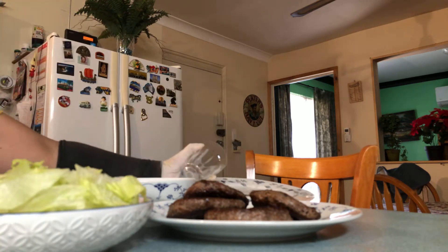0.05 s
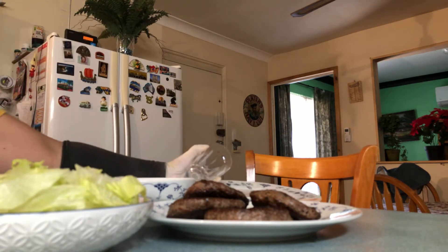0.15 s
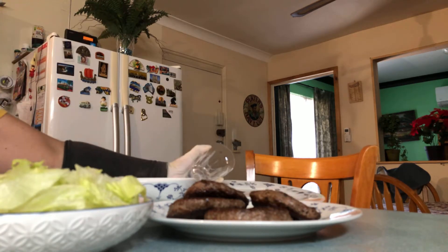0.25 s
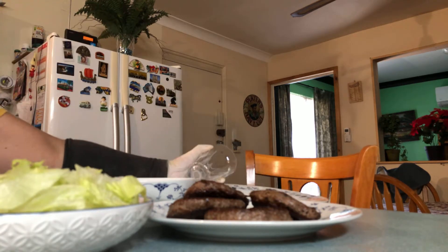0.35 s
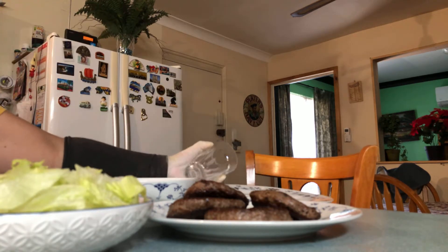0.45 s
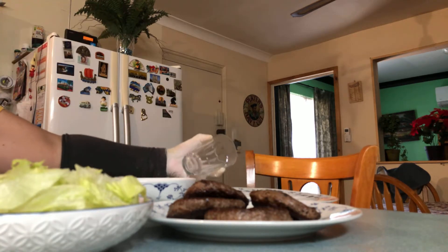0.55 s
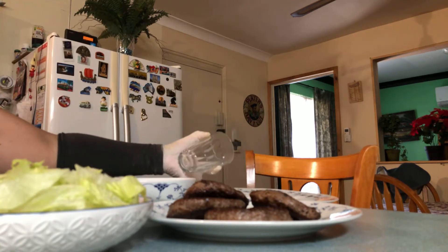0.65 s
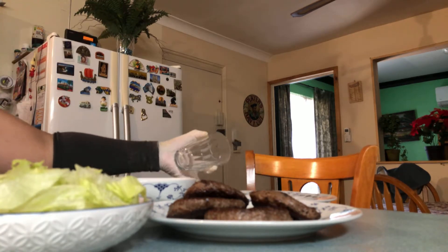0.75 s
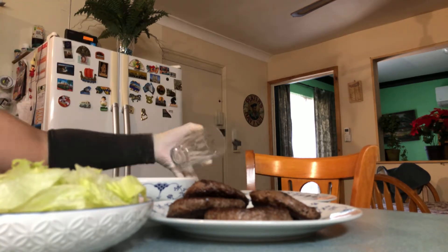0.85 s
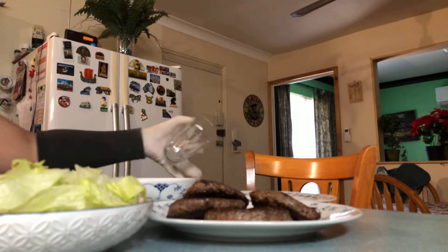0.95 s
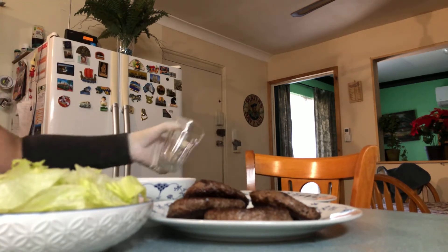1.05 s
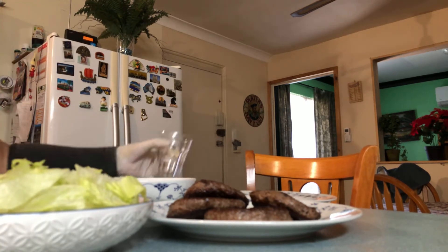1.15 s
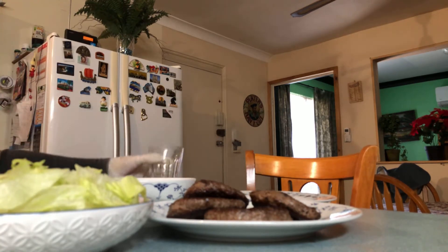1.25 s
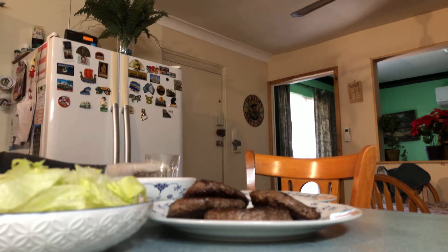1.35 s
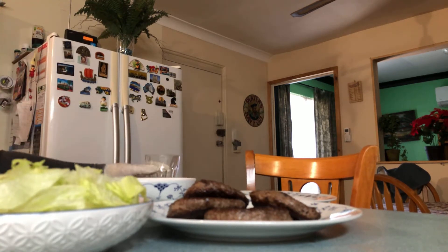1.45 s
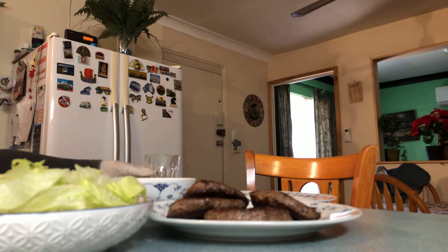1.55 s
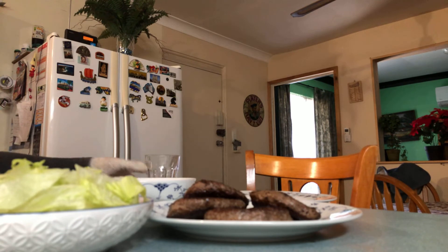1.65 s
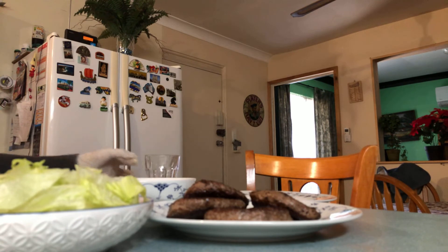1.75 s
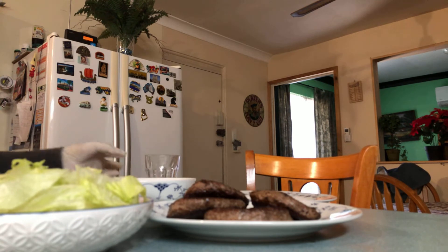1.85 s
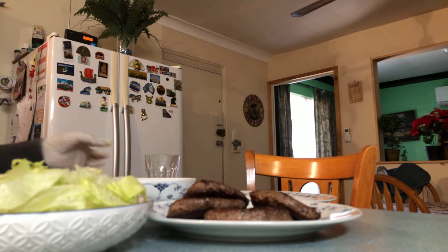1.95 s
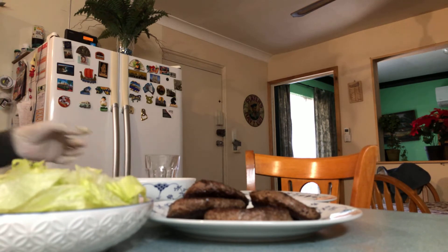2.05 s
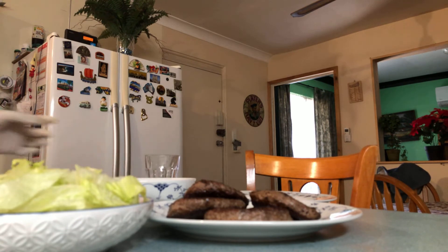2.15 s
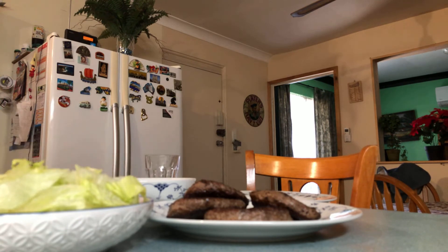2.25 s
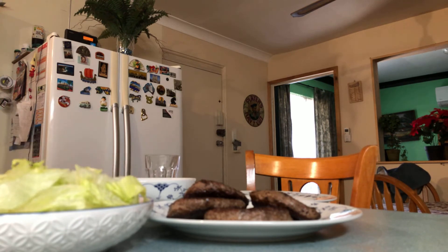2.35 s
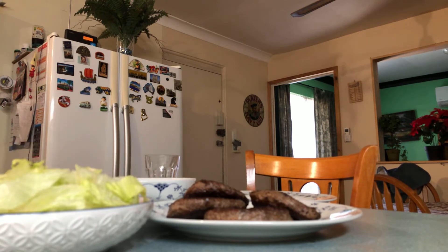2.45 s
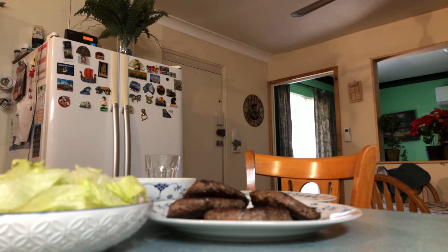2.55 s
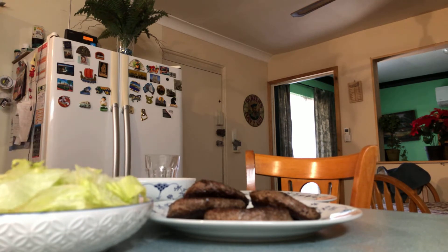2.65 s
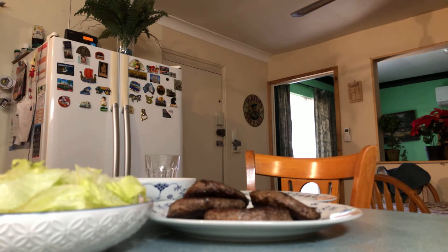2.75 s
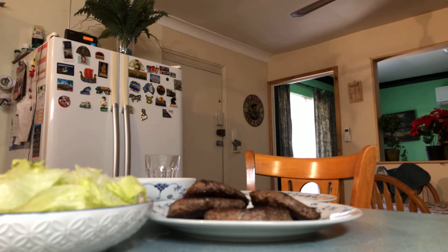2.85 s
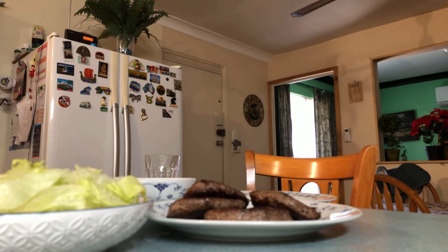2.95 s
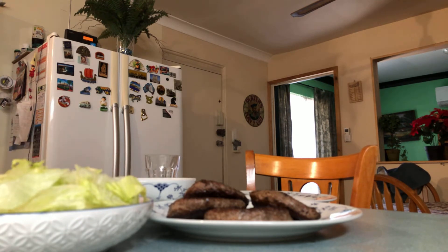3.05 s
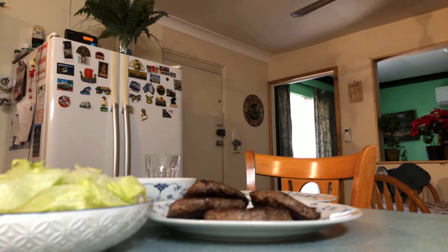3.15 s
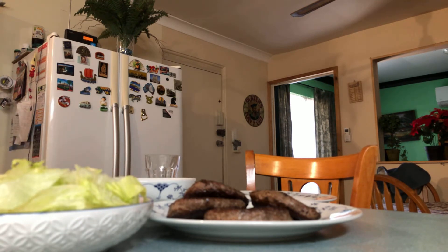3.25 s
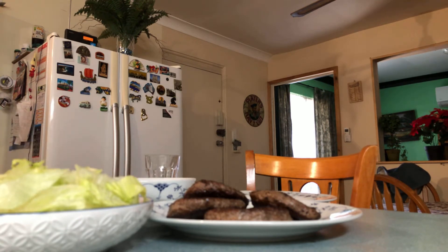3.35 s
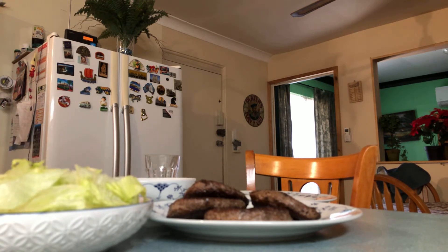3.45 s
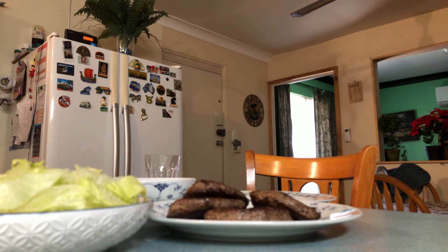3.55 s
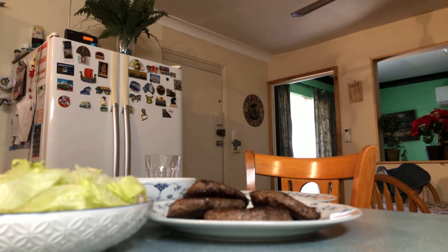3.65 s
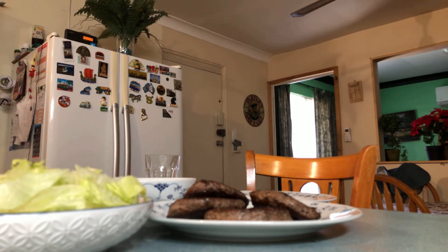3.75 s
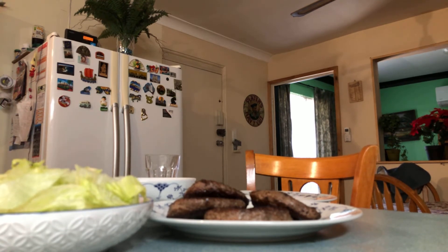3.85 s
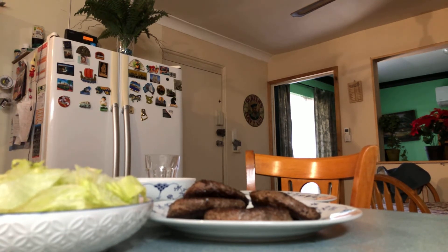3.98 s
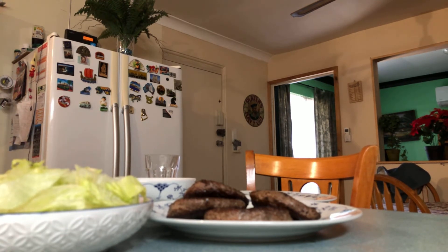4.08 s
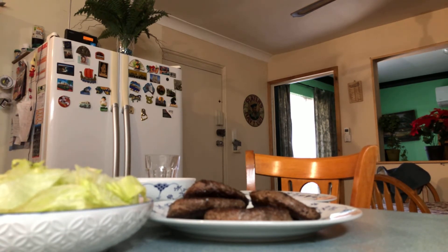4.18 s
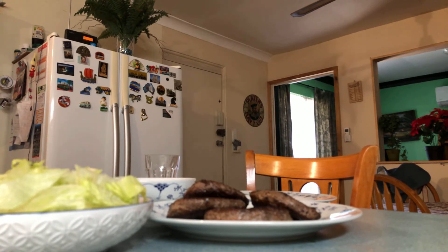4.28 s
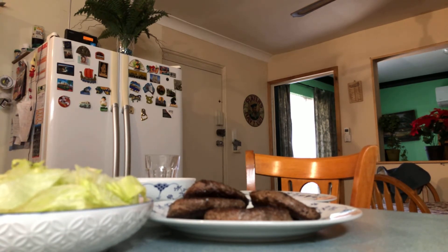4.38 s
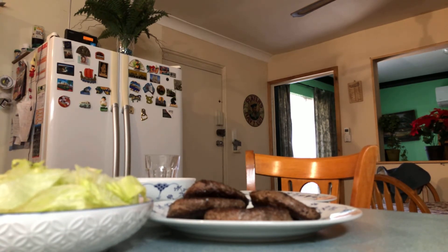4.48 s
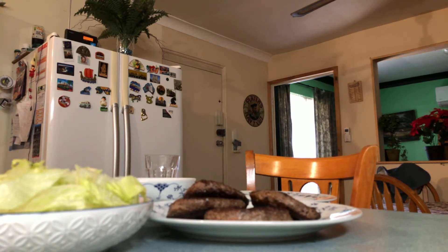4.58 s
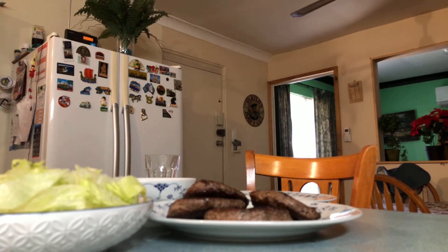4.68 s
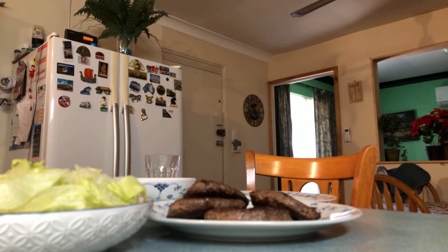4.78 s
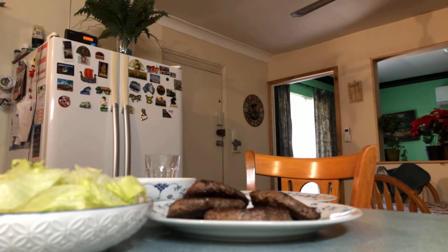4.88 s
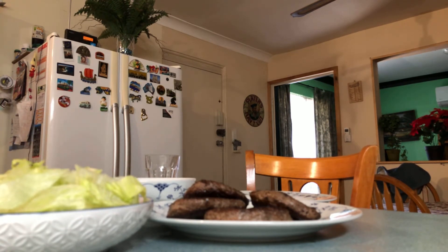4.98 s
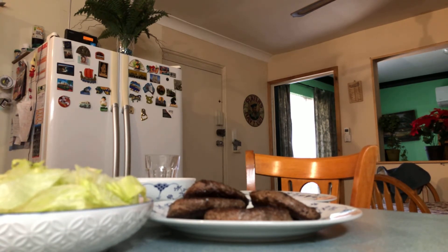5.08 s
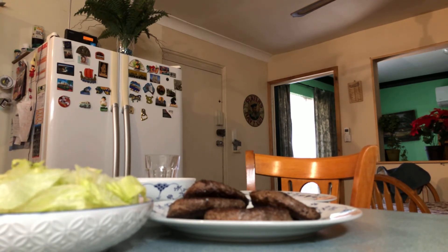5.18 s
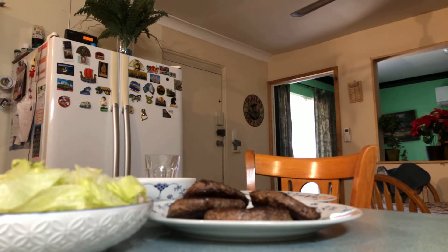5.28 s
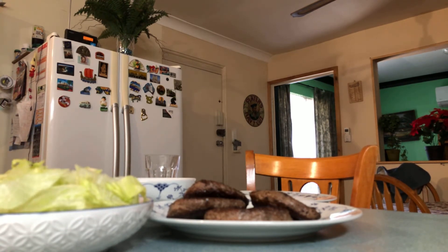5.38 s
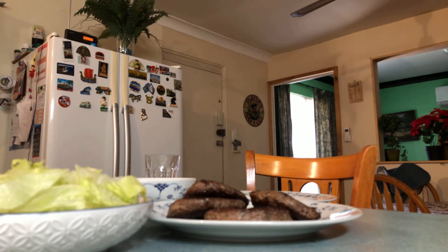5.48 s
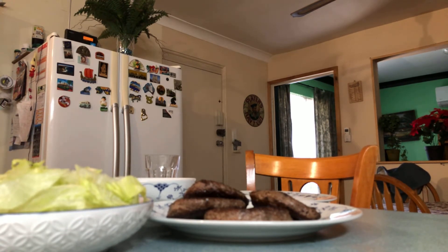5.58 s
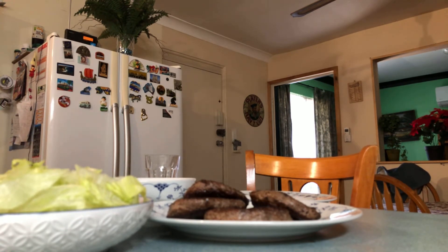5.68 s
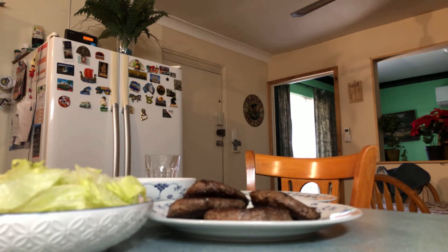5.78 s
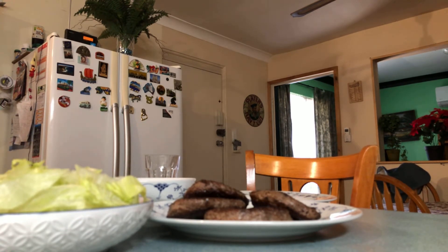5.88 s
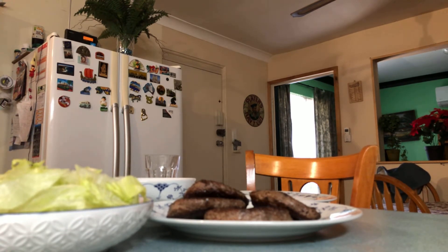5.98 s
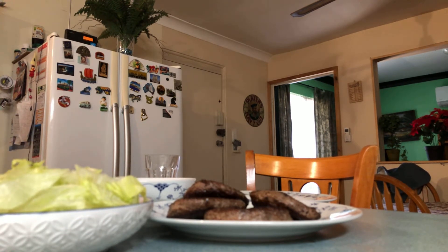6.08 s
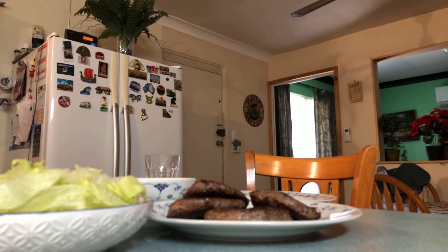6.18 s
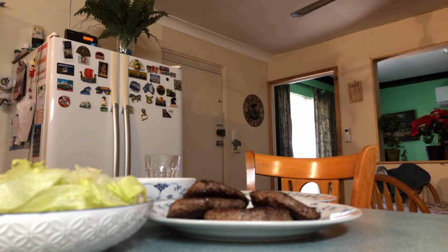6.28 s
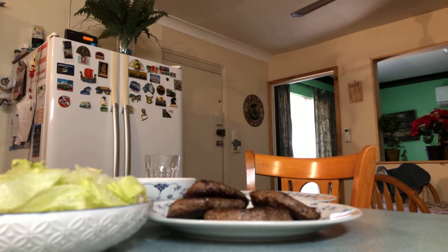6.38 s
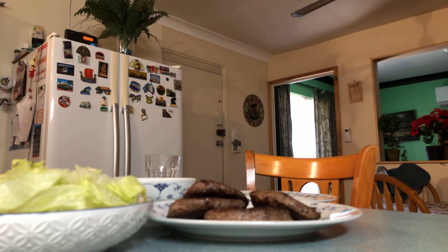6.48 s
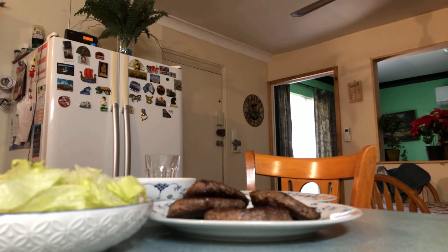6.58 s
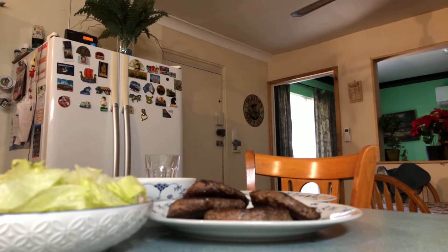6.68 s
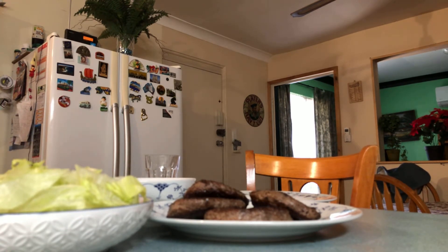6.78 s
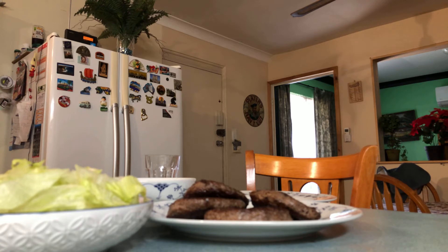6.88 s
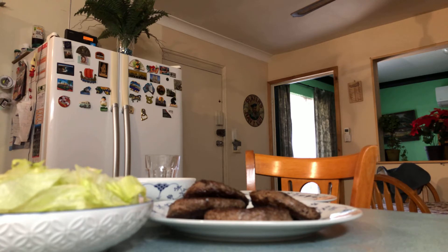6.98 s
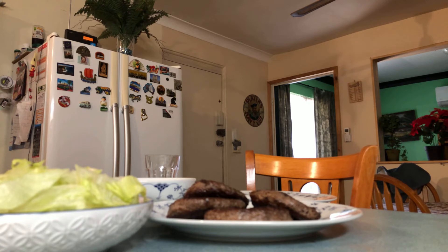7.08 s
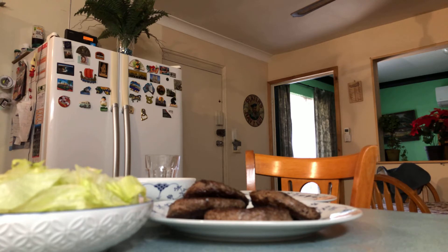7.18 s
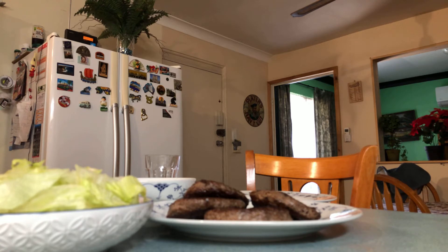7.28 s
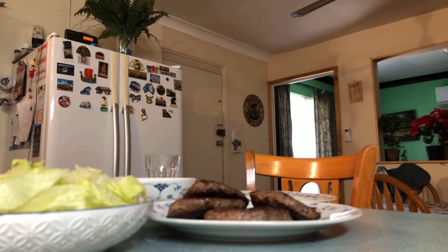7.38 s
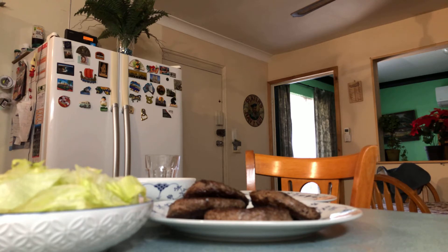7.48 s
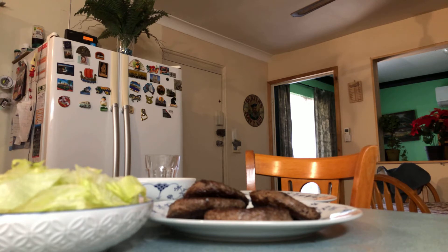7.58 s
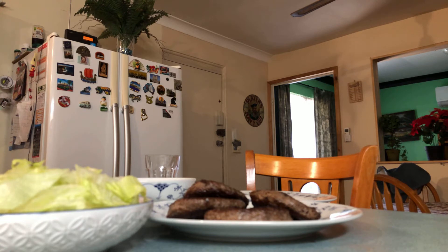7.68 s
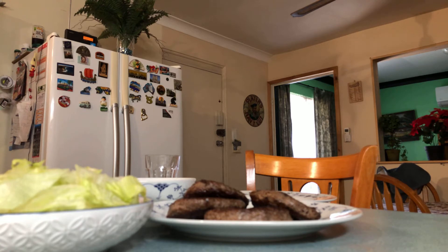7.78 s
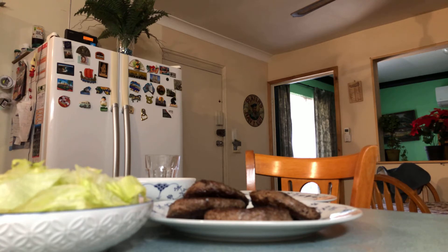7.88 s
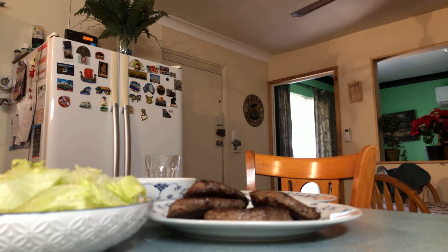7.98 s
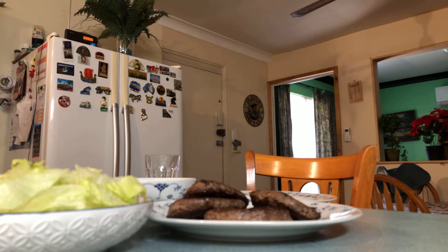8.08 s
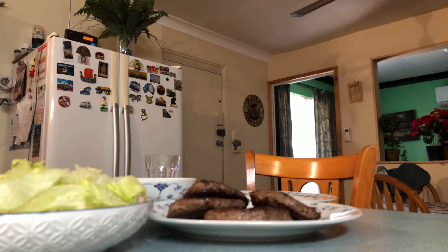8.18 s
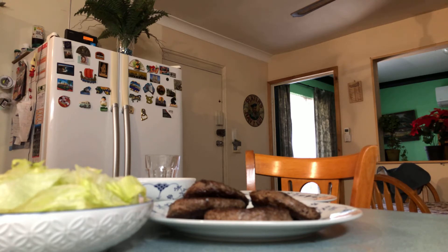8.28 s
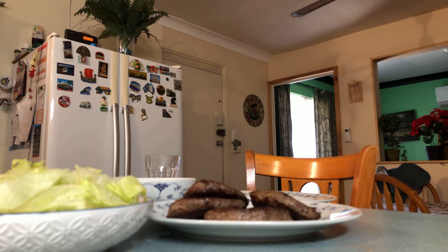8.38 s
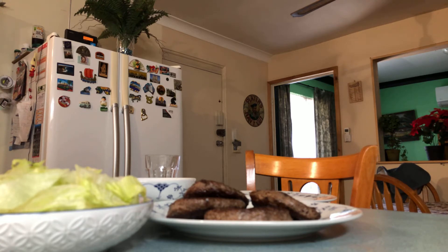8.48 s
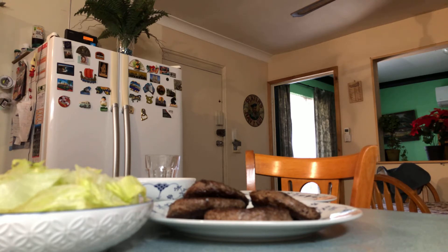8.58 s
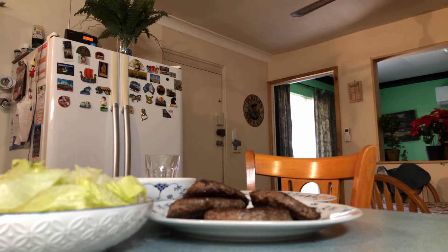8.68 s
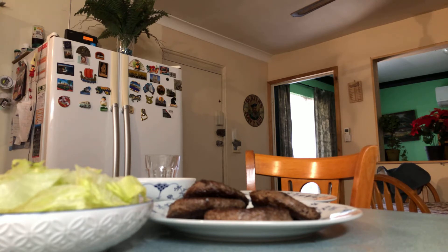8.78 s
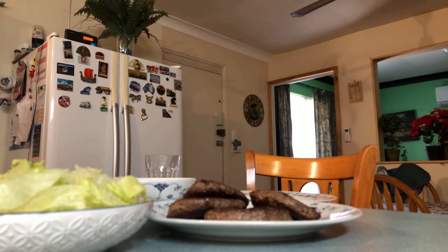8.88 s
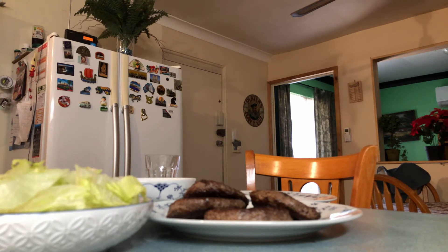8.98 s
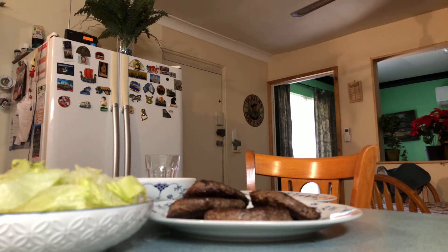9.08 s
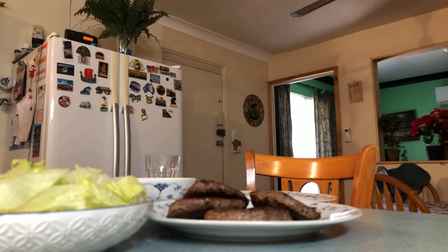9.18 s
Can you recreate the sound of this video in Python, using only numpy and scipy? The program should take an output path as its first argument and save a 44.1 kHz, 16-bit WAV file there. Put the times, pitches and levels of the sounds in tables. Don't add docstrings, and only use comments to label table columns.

```python
import sys
import numpy as np
from scipy import signal
from scipy.fft import rfft, irfft, next_fast_len
from scipy.io import wavfile
from scipy.ndimage import uniform_filter1d, map_coordinates

SR = 44100
rng = np.random.default_rng(int(sys.argv[2]) if len(sys.argv) > 2 else 0)


def log_audio(samples):
    frames = np.atleast_2d(samples).T
    limited = np.clip(frames, -1, 1)
    pcm = np.round(limited * 32767).astype(np.int16)
    wavfile.write(sys.argv[1], SR, pcm)


def ratio_of_db(decibels):
    return 10 ** (np.asarray(decibels, float) / 20)


N = 407484
SPAN = 32768
CHINA_HISS_DB, STEEL_HISS_DB = -7.5, 0.8


def unit(x):
    return x / np.sqrt(np.mean(x ** 2) + 1e-20)


def along(points, hz):
    f, v = np.transpose(points)
    return np.interp(np.log(hz + 1), np.log(f + 1), v)


def wobble(rate):
    knots = rng.standard_normal(int(N * rate / SR) + 4)
    return map_coordinates(knots, [np.arange(N) * rate / SR])


def noise(spectrum):
    m = next_fast_len(N)
    gain = ratio_of_db(along(spectrum, np.fft.rfftfreq(m, 1 / SR)))
    return unit(irfft(rfft(rng.standard_normal(m)) * gain, m)[:N])


def causal(db):
    cep = irfft(db * np.log(10) / 20)
    cep[1:SPAN // 2] *= 2
    cep[SPAN // 2 + 1:] = 0
    return np.exp(rfft(cep))


def resonant(peaks, hz):
    return 20 * np.log10(1 + sum(ratio_of_db(db) / np.hypot(1, 2 * (hz - c) / w) for c, w, db in peaks))


def add(track, s, sound):
    part = track[round(s * SR):][:len(sound)]
    part += sound[:len(part)]


def axes():
    return np.fft.rfftfreq(SPAN, 1 / SR), np.arange(SPAN // 4) / SR


# pitch_hz, t60_s
KITCHEN_T60 = [(60, 0.97), (250, 0.41), (1000, 0.53), (4000, 0.33), (12000, 0.29)]


def kitchen(delay_s):
    hz, t = np.fft.rfftfreq(256, 1 / SR), np.arange(SPAN // 192) * 128 / SR
    z = rng.standard_normal((len(hz), 2 * len(t))).view(complex)
    decay_db = -60 * t / along(KITCHEN_T60, hz)[:, None]
    tail = signal.istft(z * ratio_of_db(decay_db), SR, nperseg=256)[1]
    tail *= 1 - np.exp(-np.arange(len(tail)) / SR / delay_s)
    return rfft(tail / np.linalg.norm(tail), SPAN)


# centre_hz, width_hz
CONTACT_BANDS = [(45, 22), (190, 580), (300, 630), (1100, 1100), (3600, 4060), (9000, 4700), (15000, 17000)]


def contacts(kinds, ms, wood, wet_db, delay_s, trim_db, rise, crack):
    out = np.zeros(N)
    hz, t = axes()
    centre, width = np.transpose(CONTACT_BANDS)
    body_db = resonant(wood, hz)
    life = ms / 1000
    shape = (1 - np.exp(-t / (rise * life))) ** 2 * np.exp(-t / life) + crack * np.exp(-t / 0.0031)
    band_trim_db = np.array(trim_db) - 10 * np.log10(2 * width / SR)
    for hits, hiss_db in kinds:
        for s, thump, knock, edge in hits:
            hiss = edge + hiss_db
            levels = np.array([thump, thump, thump, knock, edge, hiss, hiss]) + band_trim_db
            levels[-1] += 0.39 * (levels[-2] - levels[-3])
            grain = ratio_of_db(3 * np.repeat(rng.standard_normal(len(t) // 64), 64))
            burst = rfft(rng.standard_normal(len(t)) * shape * grain, SPAN)
            smooth_power = uniform_filter1d(abs(burst) ** 2, size=200)
            uneven_db = 10 * np.log10(smooth_power / np.sum(shape ** 2))
            lumps_db = 2.2 * np.interp(hz / 450, np.arange(64), rng.standard_normal(64)) * (hz > 1400)
            colour = causal(along(np.c_[centre, levels], hz) + body_db + lumps_db - uneven_db)
            sound = irfft(burst * colour * (1 + ratio_of_db(wet_db) * kitchen(delay_s)))
            add(out, s - 1.3 * rise * life, sound)
    return out


def damped_notes(rows, wet_db, damping):
    out = np.zeros(N)
    hz, t = axes()
    for s, db, pitch_hz, t60 in rows:
        rattle = rfft(rng.standard_normal(len(t)) * ratio_of_db(-60 * t / np.minimum(t60, .5)), SPAN)
        width = damping * pitch_hz
        mode = 1j * hz * width / (pitch_hz ** 2 - hz ** 2 + 1j * hz * width)
        sound = irfft(rattle * mode ** 2 * (1 + ratio_of_db(wet_db) * kitchen(0.013)))
        add(out, s, ratio_of_db(db - 1) * sound / np.abs(sound).max())
    return out


# pitch_hz, density_db (per Hz)
HUSH = [(25, -21.5), (92, -4.5), (166, -1.5), (330, -2.5), (470, -10), (840, -16.5), (1190, -23),
        (16000, -40.5)]


def house_hush():
    return ratio_of_db(-58.5 + 0.27 * wobble(1.6) + .8 * wobble(25)) * noise(HUSH)


# start_s, peak_db, pitch_hz, t60_s
SHAKES = [
    (.71, -43, 138.4, 0.25),
    (1.3, -40.5, 60, 0.28),
    (3.165, -39, 80, 0.16),
    (3.335, -34.5, 77.4, .25),
    (3.44, -42, 55, .3),
    (3.555, -48, 70, .2),
    (3.7, -21.5, 546, 0.28),
    (3.755, -24, 1900, .15),
    (5.2, -49, 110, .2),
    (7.63, -40, 149, 0.48),
]


def shakes():
    return damped_notes(SHAKES, -7, damping=.45)


# start_s, push_db, loose_db (cutlery over the push)
SLIDES = [
    [(0.0, -72, -18), (0.168, -53, -22), (0.646, -51.5, -4), (0.778, -52, -6.5), (1.0, -57, -38)],
    [(2.2, -93, 3), (3.096, -64, -3.5), (3.492, -42.5, -19), (3.726, -49, -16.5), (3.866, -46, 0.5),
     (4.018, -61.5, -3), (4.15, -72, -6)],
    [(5.05, -76.5, -10.5), (5.67, -83, -2.5), (5.94, -48, -21), (6.11, -54.5, -8.5), (6.34, -42, -15),
     (6.58, -50.5, -20), (7.1, -52.5, -17), (7.27, -46, -38), (7.44, -69, -8)],
    [(7.53, -67, -5), (7.93, -70, -2), (8.12, -46.5, -6), (8.27, -55, -11), (8.82, -51, -10.5),
     (9.24, -52, -2)],
]
# pitch_hz, density_db (per Hz)
RUMBLE = [(50, -23.5), (120, -2), (300, 13), (600, -2), (1200, -53.5)]
SCRAPE = [(300, -19), (700, 13.5), (1300, 3.5), (2500, -4.5), (6000, -36)]
RUSTLE = [(1500, -30.5), (3500, 7.5), (7500, -1), (9000, -7.5), (15500, -10)]


def sliding():
    rows = []
    for drag in SLIDES:
        rows += [(drag[0][0] - .03, -90, 0), *drag, (drag[-1][0] + 0.063, -90, 0)]
    start_s, push_db, loose_db = np.transpose(rows)
    t = np.arange(N) / SR
    rumble_db = np.interp(t, start_s, push_db)
    rustle_db = rumble_db + np.interp(t, start_s, loose_db)
    jolt = np.tanh(wobble(60))
    rumble = ratio_of_db(rumble_db) * unit(ratio_of_db(7.7 * jolt) * noise(RUMBLE))
    scrape = ratio_of_db(rumble_db - 3.5) * unit(ratio_of_db(2.5 * jolt + 0.83 * wobble(140)) * noise(SCRAPE))
    rustle = ratio_of_db(rustle_db) * unit(ratio_of_db(3.3 * jolt + 0.74 * wobble(300)) * noise(RUSTLE))
    return rumble + scrape + rustle


# pitch_hz, width_hz, level_db
COUNTER_WOOD = [(138.8, 7.8, 13.5), (318.7, 19.5, 8), (488, 25, 4.5), (1358, 340, -0.5), (2190, 120, -7.5)]
# start_s, thump_db, knock_db, edge_db
CHINA_HITS = [(2.118, -50, -59.5, -71), (2.765, -49, -51.5, -58), (2.824, -42, -60, -56.5),
              (3.123, -40, -48.5, -60), (3.167, -31, -44, -38.5), (3.692, -12.5, -32.5, -34.5),
              (5.335, -55, -59, -58), (5.532, -45, -62, -61.5), (5.642, -39.5, -57.5, -65),
              (5.895, -33.5, -48.5, -54.5), (6.055, -24.5, -43, -55), (6.185, -15.5, -24, -26),
              (6.363, -30, -46, -42.5), (6.505, -28.5, -42, -42), (6.881, -32, -44.5, -57),
              (6.969, -37, -54, -53.5), (7.099, -25.5, -46, -38.5), (7.165, -25, -41, -40),
              (7.274, -44, -34, -39), (7.572, -41.5, -52.5, -58), (7.703, -39, -51, -53),
              (7.907, -31.5, -52, -56), (8.09, -26.5, -29.5, -30.5), (8.209, -23.5, -41, -43.5),
              (8.42, -35, -34, -39.5), (8.446, -15, -29.5, -30), (8.489, -55, -33.5, -38.5),
              (8.602, -53, -44, -70)]
# start_s, thump_db, knock_db, edge_db
STEEL_HITS = [(2.945, -50, -59, -53.5), (3.051, -33, -98, -78), (3.328, -17, -36, -58.5),
              (3.557, -22, -38, -81), (3.76, -25.5, -28.5, -35), (5.185, -45.5, -55, -44.5),
              (5.744, -37.5, -51.5, -60), (5.972, -28.5, -58, -61), (6.113, -29.5, -37, -54),
              (6.229, -22, -34.5, -34.5), (6.404, -22, -33.5, -47.5), (6.825, -32.5, -77, -55),
              (7.308, -28, -32, -46), (7.788, -35, -54, -56.5), (7.93, -47, -42.5, -59),
              (7.973, -27.5, -41, -54), (8.0, -32, -39, -38), (8.662, -27.5, -38, -45.5),
              (8.834, -31, -39.5, -46.5), (9.029, -31, -42, -44.5)]


def counter_knocks():
    kinds = [(CHINA_HITS, CHINA_HISS_DB), (STEEL_HITS, STEEL_HISS_DB)]
    return contacts(kinds, 11, COUNTER_WOOD, 0.93, 0.0025,
                    [-36.5, -14.5, -7.0, -3, -3.0, -4.5, -8.0], rise=.16, crack=0.41)


# start_s, thump_db, knock_db, edge_db
CHINA_STROKES = [(0.422, -45, -47, -55), (0.501, -40, -46, -43.5), (0.609, -45, -42, -39),
                 (0.664, -55, -60, -41), (1.438, -26, -54, -55), (1.849, -38, -58, -64),
                 (2.455, -50, -47.5, -43.5), (5.165, -51.5, -54.5, -44.5), (6.178, -18, -23.5, -36.5),
                 (6.449, -18.5, -29.5, -38), (6.787, -25, -37.5, -52), (7.326, -49, -26, -33.5),
                 (7.628, -34, -70, -57), (7.649, -35, -38, -42), (9.143, -19, -30.5, -30.5)]
# start_s, thump_db, knock_db, edge_db
STEEL_STROKES = [
    (0.724, -7, -21, -51),
    (2.385, -51, -53, -62),
    (3.784, -8, -31.5, -32),
    (3.872, -38, -38, -37),
    (7.21, -33, -37, -52),
    (8.89, -19, -36, -37.5),
    (9.163, -21, -36, -28.5),
]


def strokes():
    kinds = [(CHINA_STROKES, CHINA_HISS_DB), (STEEL_STROKES, STEEL_HISS_DB)]
    return contacts(kinds, 19, COUNTER_WOOD, -0.79, 0.0051,
                    [-30.5, -13.0, -7.0, 1.5, 3.5, 5.5, 7.5], rise=1.2, crack=0)


# start_s, thump_db, knock_db, edge_db
RATTLES = [(3.725, -45, -36, -36.5), (3.81, -39, -51, -43), (3.895, -44.5, -43.5, -38),
           (7.085, -39, -37, -51), (7.135, -35, -33.5, -39), (2.47, -60, -65, -67), (2.79, -55, -70, -51.5),
           (8.015, -37, -35, -39.5), (8.858, -25, -37, -32.5), (9.056, -36, -39, -32),
           (9.112, -34, -37.5, -35), (2.42, -60, -51, -53), (3.96, -55, -48, -47.5)]


def rattles():
    return contacts([(RATTLES, STEEL_HISS_DB)], 19, COUNTER_WOOD, -1, 0.0052,
                    [-22, -2, -29, 5.5, 8, -1.5, 6], rise=1.2, crack=0)


# start_s, peak_db, pitch_hz, t60_s
CLINKS = [(0.4643, -39, 4560, 0.1), (0.4957, -39, 4250, 0.5), (0.562, -38, 4100, 0.1),
          (0.5633, -34, 1860, 0.11), (0.572, -35, 4800, 0.12), (1.015, -61.5, 3920, 0.16),
          (2.9442, -49, 4600, 0.25), (5.7409, -59, 1660, 0.12), (6.0691, -47, 4000, 0.11),
          (7.0973, -28.5, 2200, 0.045), (7.1794, -36.5, 3300, 0.22), (7.2264, -47, 4900, 0.18),
          (7.2729, -33, 1910, 0.031), (7.3073, -31, 2000, 0.042), (7.9286, -38, 2040, 0.057),
          (8.0884, -26, 1950, 0.025), (8.207, -39, 1820, 0.088), (8.6607, -32.5, 2350, 0.02),
          (8.661, -35, 6540, 0.014), (5.186, -45, 12300, 0.34), (7.115, -46, 11500, 0.47),
          (7.225, -44, 11500, 0.13), (7.568, -57, 4200, .15), (7.787, -61, 7300, 0.12)]
# start_s, peak_db, pitch_hz, t60_s
BOOMS = [
    (.4, -36.5, 253, 0.55),
    (.47, -36.5, 253, 0.19),
    (6.395, -26, 667, 0.19),
    (8.445, -25.5, 296, 0.11),
    (8.662, -34.5, 837, 0.2),
    (9.05, -39, 5150, 0.23),
]


def clinks_and_booms():
    return damped_notes([*CLINKS, *BOOMS], -8, damping=.13)


# start_s, peak_db, pitch_hz, t60_s
HELD_NOTES = [(.565, -34, 2580, 0.23), (.566, -36, 3320, 0.22), (.705, -30, 136.3, 0.3),
              (.708, -42, 2510, 0.26), (6.186, -21.5, 1266, 0.033), (6.19, -24.5, 309, 0.38),
              (7.103, -31.5, 292, 0.23), (7.163, -31.5, 295, 0.45), (8.662, -39, 1000, 0.088),
              (.563, -30, 1600, .14), (5.19, -53, 840, 0.28)]


def held_notes():
    return damped_notes(HELD_NOTES, -9.5, damping=.07)


# pitch_hz, level_db (rms)
PLATE = [(812.9, -52), (1001, -60), (1050, -63), (1330, -56), (1933, -72), (2654, -66), (3488, -75),
         (3806, -69)]
GLASS = [(1820, -76), (2487, -72), (2649, -68), (3472, -73), (3806, -71), (4530, -73), (5184, -73),
         (5997, -81), (6436, -78), (7757, -79), (8400, -82), (9200, -86), (10460, -88)]
LADLE = [(5249, -69), (7009, -79), (11590, -80), (14750, -86)]
SPOONS = [(5324, -58), (7773, -63), (7897, -64), (10083, -62), (12748, -64), (13264, -66), (15246, -65)]
FORKS = [(2300, -74), (3542, -72), (5157, -68), (5706, -83), (6503, -76), (7391, -75), (7900, -76),
         (9663, -76), (10842, -78), (11698, -76), (12032, -77), (12450, -79), (14836, -72), (15116, -77)]
TONGS = [(8043, -84), (9539, -80), (11547, -85), (12920, -84), (13600, -82)]
TRAY = [(4328, -60), (5012, -64), (5254, -63), (7009, -61), (7967, -62), (9523, -68)]
PEELER = [(5265, -85), (6702, -82), (7004, -85), (14777, -83)]
KNIVES = [(5378, -73), (6363, -76), (7117, -76), (7650, -80), (7833, -74), (7983, -78), (8823, -66),
          (10223, -72), (11386, -77), (13372, -74), (14300, -78)]
LID = [(11563, -78)]
WHISK = [(9679, -63), (10567, -64), (12053, -59), (14083, -66)]
# start_s, level_db (over its modes), t60_s
STRIKES = [(PLATE, [(.041, 7, 0.46), (.117, 4.5, 0.63), (.295, -5, .6)]), (GLASS, [(.042, 3, .6),
           (.118, 2, .6), (.295, 6, .6), (.367, 8, .5), (.565, 13, .4), (.701, 15, .6)]),
           (LADLE, [(3.362, 13, .12)]), (SPOONS, [(3.753, 6, .45), (3.87, 2, .3)]),
           (FORKS, [(5.186, 16, .45), (5.741, -3, .2)]), (TONGS, [(5.963, 7, 0.39), (6.11, 7, .25)]),
           (TRAY, [(6.19, 9, 0.45)]), (PEELER, [(6.81, 9, 0.49)]), (KNIVES, [(7.125, 3, .3), (7.18, 9, .4),
           (7.332, 18, .39)]), (LID, [(8.175, 13, .3), (8.47, 24, .45)]), (WHISK, [(9.135, 3, 0.6)])]


def ringing():
    out, t = np.zeros(N), np.arange(SR * 3 // 5) / SR
    for modes, strikes in STRIKES:
        hz, level = np.transpose(modes)[..., None]
        for s, db, t60 in strikes:
            knots = rng.standard_normal((len(modes), 40))
            waver_db = 5.5 * np.array([np.interp(t * 60, np.arange(40), row) for row in knots])
            decay_db = 60 * t / t60 * (hz / 5000) ** 0.22
            ring = ratio_of_db(level + db + waver_db - decay_db) * np.sin(2 * np.pi * hz * t)
            add(out, s, ring.sum(0) * (1 - np.exp(-t / .004)))
    return out


# pitch_hz, width_hz, level_db
TABLE_WOOD = [(139, 19, 10), (253, 12, 15.5), (827, 34, 5.5), (1000, 21, -11.5), (1290, 67, -1.5)]
# start_s, thump_db, knock_db, edge_db
TABLE_HITS = [
    (0.041, -22.5, -37, -49),
    (0.116, -21.5, -36, -48.5),
    (0.366, -35.5, -58, -51),
    (0.464, -36, -53, -38),
    (0.564, -30.5, -37, -36),
    (1.291, -44, -56, -37),
    (1.76, -59, -71, -72),
]


def table_knocks():
    return contacts([(TABLE_HITS, -15)], 8.7, TABLE_WOOD, -1.8, 0.0041,
                    [-35.5, -11.5, -2, -0.5, -5.0, -2.5, 0.5], rise=0.16, crack=0.29)


# pitch_hz, density_db (per Hz)
FIRST_COLOUR = [(35, -46.5), (130, -19), (250, -3.5), (900, -14.5), (1700, -16.5), (2400, -30), (5000, -62),
                (15500, -66)]
SECOND_COLOUR = [(35, -44), (150, -30), (250, -9.5), (1250, -16), (1650, -24), (2500, -37.5), (5000, -52.5),
                 (15500, -71.5)]
# pitch_hz, width_hz, level_db
FIRST_RING = [(137, 10, 10), (251, 18, 19), (374, 32, -3), (640, 54, -5), (818, 110, 19), (1230, 73, -7),
              (1460, 110, 4)]
SECOND_RING = [(290, 120, 16.5), (488, 40, 5), (816, 71, 1.5), (1210, 130, 10.5), (2220, 360, 12)]
# start_s, peak_db, far_rim_db, colour, resonances
THUDS = [
    (0.6963, -13.5, -9, FIRST_COLOUR, FIRST_RING),
    (1.275, -38.5, -2.5, SECOND_COLOUR, SECOND_RING),
    (1.2862, -0.5, 10.5, SECOND_COLOUR, SECOND_RING),
]


def glass_thuds():
    out = np.zeros(N)
    hz, t = axes()
    bending = np.exp(-2j * np.pi * 0.24 * np.sqrt(hz))
    far_rim = np.exp(-2j * np.pi * hz * .0036) / (1 + (hz / 1500) ** 4) / (1 + (620 / (hz + 1)) ** 4)
    for s, db, rock_db, colour, modes in THUDS:
        blow = causal(np.maximum(along(colour, hz), -70) + resonant(modes, hz)) * bending
        blow = blow * (1 + ratio_of_db(rock_db) * far_rim)
        board = rng.standard_normal(len(t)) * ratio_of_db(-60 * t / 0.27)
        board_answer = ratio_of_db(-8) * rfft(board / np.linalg.norm(board), SPAN)
        answer = 1 + board_answer + ratio_of_db(-6.5) * kitchen(0.0038)
        add(out, s, ratio_of_db(db) * irfft(blow * answer) / np.abs(irfft(blow)).max())
    return out


def scene():
    background = house_hush() + shakes() + sliding()
    counter = counter_knocks() + strokes() + rattles()
    tones = clinks_and_booms() + held_notes() + ringing()
    table = table_knocks() + glass_thuds()
    return (background + counter + tones + table)[None]


def low_pass(x):
    return signal.sosfilt(signal.butter(12, 16380, fs=SR, output="sos"), x)


# pitch_hz, gain_db
MICROPHONE = [(20, -28), (50, -5.5), (100, -3), (7500, 0.5), (8500, -2.5), (15000, -3)]


def record(dry):
    m = next_fast_len(N)
    hz = np.fft.rfftfreq(m, 1 / SR)
    response = ratio_of_db(along(MICROPHONE, hz)) * (hz < 15850)
    kept = irfft(rfft(dry, m) * response, m)[:, :N]
    return low_pass(kept)


dry = scene()
out = record(dry)
log_audio(out)
```